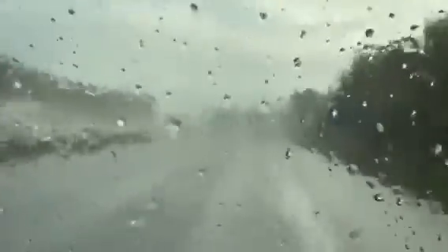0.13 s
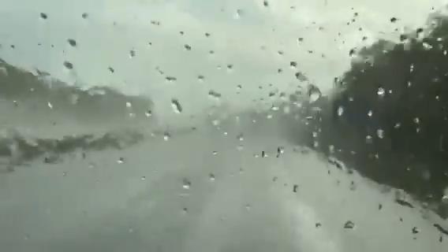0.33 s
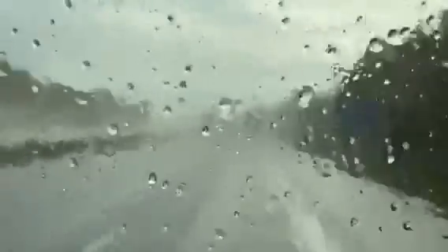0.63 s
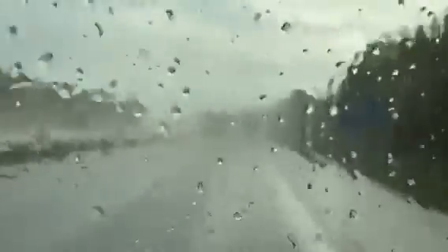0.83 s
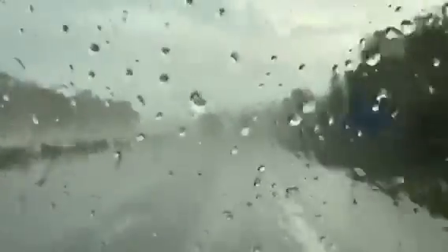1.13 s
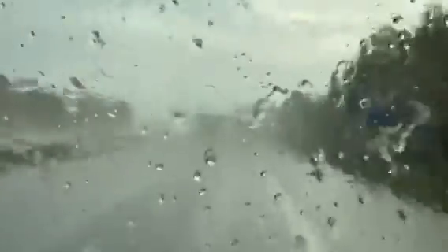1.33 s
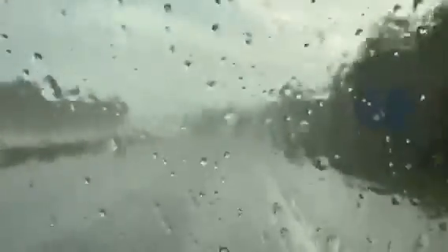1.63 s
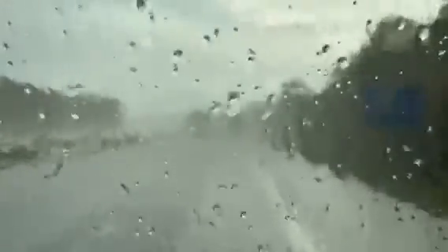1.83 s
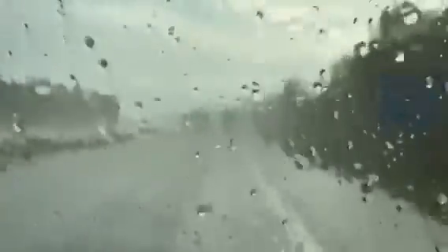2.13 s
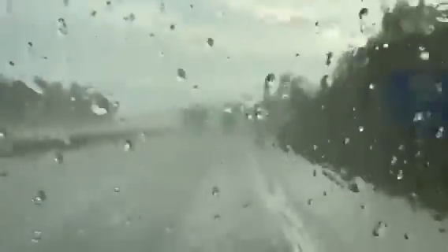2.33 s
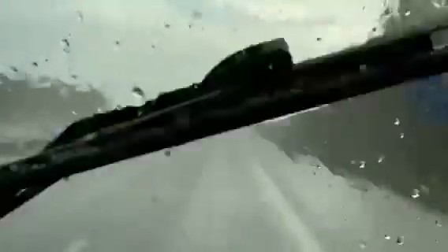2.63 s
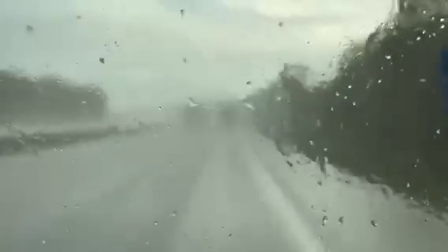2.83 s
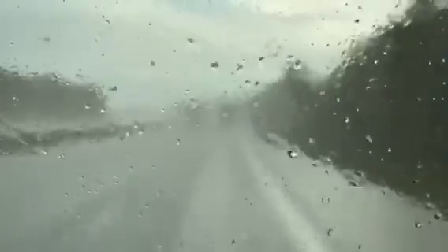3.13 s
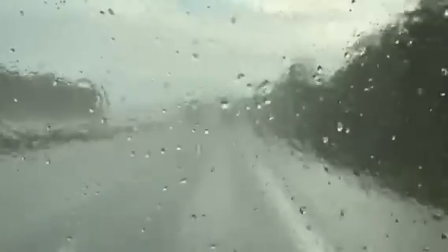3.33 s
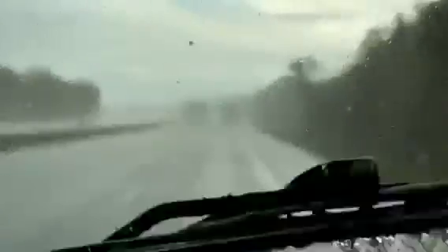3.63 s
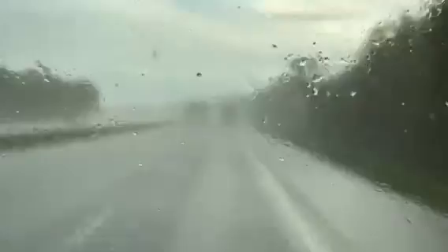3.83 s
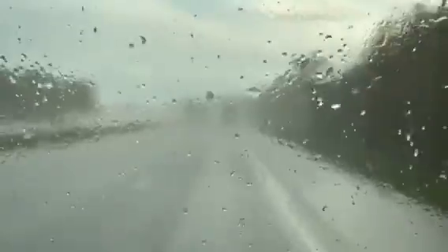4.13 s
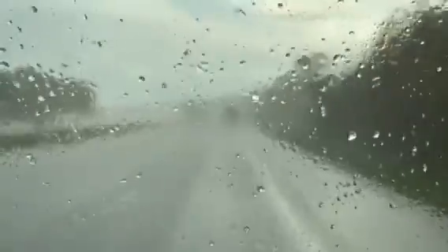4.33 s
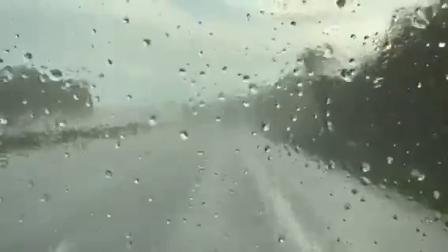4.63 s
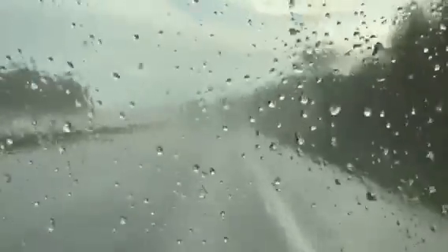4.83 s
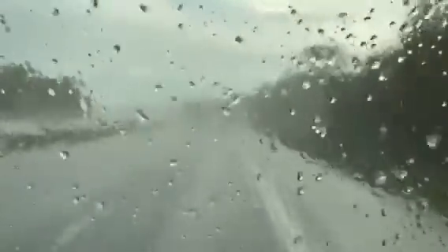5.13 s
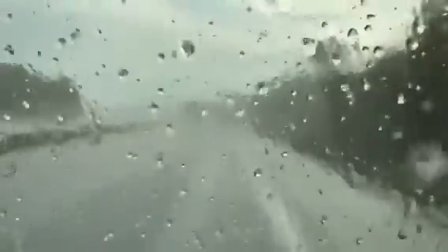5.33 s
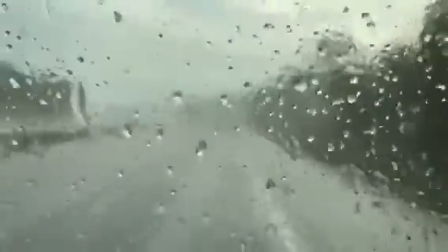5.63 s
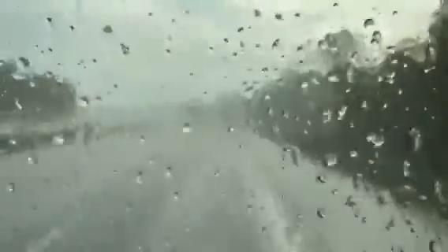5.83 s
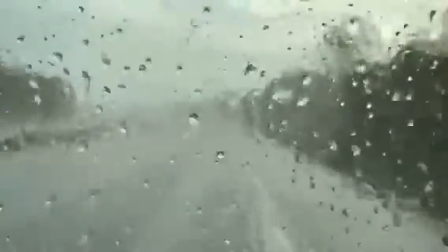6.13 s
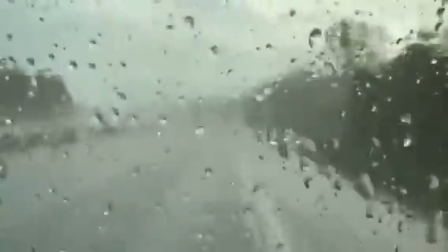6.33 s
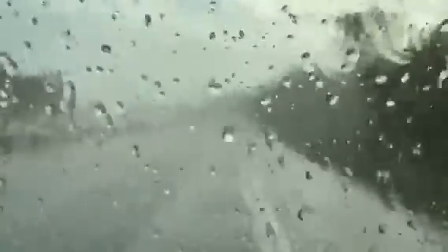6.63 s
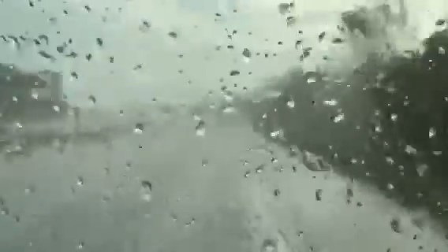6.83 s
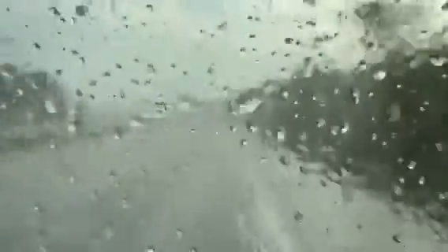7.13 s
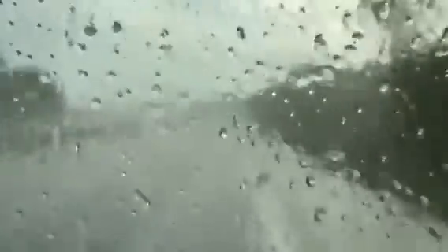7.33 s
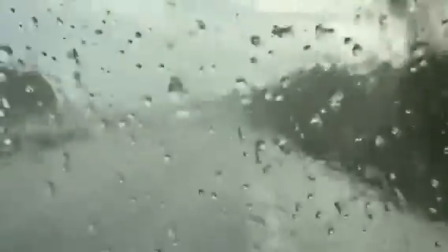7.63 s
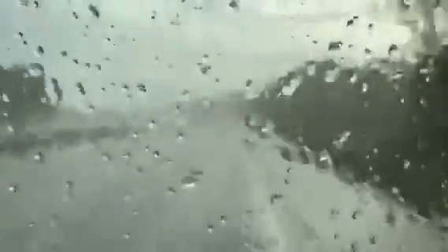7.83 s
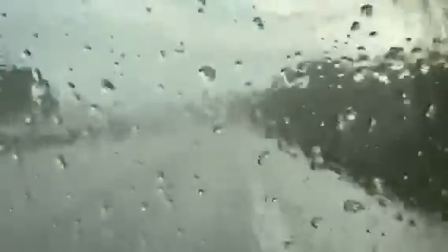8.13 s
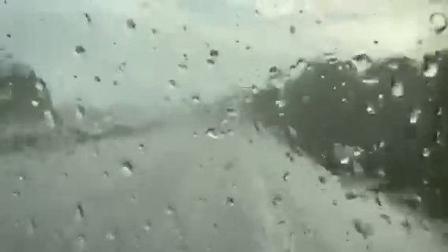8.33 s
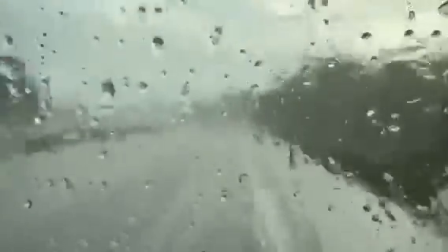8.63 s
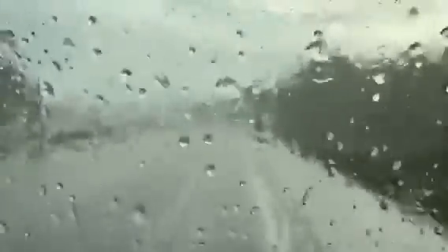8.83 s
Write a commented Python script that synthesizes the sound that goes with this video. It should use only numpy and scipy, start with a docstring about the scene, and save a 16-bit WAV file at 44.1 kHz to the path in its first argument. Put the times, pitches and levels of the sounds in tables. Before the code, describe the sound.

Heard from the front seat of a car on a highway, heavy rain spatters densely on the windscreen. Beneath it run a deep road rumble, a low engine hum and the roar of tyres on water. The rain swells around the middle, with a few fat drops snapping on the glass, then eases toward the end. The engine note rises slightly early on and drops back about two seconds later.

```python
"""Highway downpour, inside a car.

The road rumbles through the floor, the engine hums in the cabin, the tyres roar and sing on the water.
Sheets of rain spatter on the windscreen, swelling and easing; a few fat drops snap out.
The gearbox whines faintly during one spell in a lower gear. Later a body panel drones briefly."""
import sys
import numpy as np
from scipy import signal
from scipy.fft import rfft, irfft
from scipy.io import wavfile

SR = 44100
rng = np.random.default_rng(int(sys.argv[2]) if len(sys.argv) > 2 else 0)


def store_pcm(level_fs):
    """Save levels as 16-bit WAV."""
    pcm = np.round(np.clip(level_fs, -1, 1) * 32767).astype(np.int16)
    wavfile.write(sys.argv[1], SR, np.atleast_2d(pcm).T)


N = 395577
T, HZ = np.arange(N) / SR, np.fft.rfftfreq(N, 1 / SR)

# panel, cabin air and glass resonances, and narrow throbs at wheel-turn orders: f/Hz, width/Hz, lift/dB
BODY_PEAKS = [(39.5, 4.5, 3.5), (46, 4, -6), (52.6, 5, 4), (87.6, 6, 0), (98.4, 6.5, 2), (129, 10, 0.5),
              (182, 11, 0.5), (261, 24, 1.5), (330, 14, 1.5), (394, 8.9, 5), (653, 30, 1), (835, 80, 1),
              (4280, 150, 2.5), (5080, 400, 4), (7000, 200, 1.1)]
# left-right likeness: f/Hz, coherence/0-1
COHERENCE = [(30, .999), (60, .993), (100, .98), (150, .93), (300, .76), (500, .72), (700, .52), (1200, .4),
             (1550, .1), (1900, .7), (2400, .94), (3000, .997), (4000, 1), (8000, 1), (9000, .998)]
# left minus right: f/Hz, level/dB
TILT_DB = [(30, 0), (100, -0.9), (200, 0), (400, 2), (700, 1), (1100, 2), (1550, 6), (2000, 4.5),
           (2500, -0.3), (3000, 0)]
# body shell spectrum: f/Hz, level/dB
RUMBLE_DB = [(10, -32), (28, -13), (40, -3.5), (55, -2.5), (90, -0.9), (125, -6.5), (160, -8), (192, -4.5),
             (222, -16.5), (290, -17.3), (400, -22.5), (1200, -61)]
# asphalt coarseness: t/s, level/dB
ASPHALT_DB = [(0, -23.5), (1.8, -22), (2.2, -24), (5.0, -21.5), (5.8, -24), (7.1, -28), (8.97, -26.5)]
# rough and smooth patches: t/s, length/s, lift/dB
BUMPS_DB = [(1.25, .12, 2), (1.62, 0.23, 1.5), (2.12, 0.09, -0.5), (3.08, .1, 2.5), (3.42, .1, 1),
            (3.81, .1, 2.5), (4.34, 0.11, 1), (4.9, .2, 1), (5.54, .14, 3), (5.72, 0.18, -2.5),
            (6.17, 0.5, 2), (7.5, .15, 5)]
# wet tyre spectrum: f/Hz, level/dB
ROAR_DB = [(100, -26), (228, -3.5), (280, 0.5), (352, -4.5), (440, -0.5), (620, -2), (820, -1.5),
           (1050, -6), (1500, -11.5), (2500, -17), (8000, -32)]
# roar from standing water: t/s, level/dB
WATER_DB = [(0, -29.5), (.4, -26), (.9, -26), (1.2, -29), (1.45, -27.6), (2.15, -29.5), (3.05, -28.5),
            (3.38, -25.7), (3.57, -27.4), (4.45, -25), (4.75, -26.5), (5.7, -25.5), (6.7, -26.5),
            (7.0, -27), (7.34, -29.5), (7.55, -29), (8.07, -31.8), (8.8, -28.5)]
# crank speed in top gear: t/s, f/Hz
CRUISE_HZ = [(0, 28.4), (.4, 28.4), (1.5, 28.28), (3.9, 28.44), (5.5, 28.64), (7.5, 28.68), (7.9, 28.47),
             (8.97, 28.4)]
# engine orders: crank multiple, level/dB
ORDERS_DB = [(3, -7), (4, -1), (5, -4), (6, 0)]
# cabin boom response: f/Hz, level/dB
CABIN_DB = [(85, -4), (113, 1.5), (146, -5.5), (172, 0.5), (186, 0.5), (222, -16.5)]
# hum from engine load: t/s, level/dB
LOAD_DB = [(0, -28), (.7, -26.5), (1.5, -27.5), (2.48, -27), (2.7, -31), (3.15, -27), (3.6, -31.5),
           (4.0, -28), (5.2, -27.5), (5.5, -30), (5.72, -24), (6.0, -29), (6.22, -26), (6.7, -28.5),
           (7.6, -32), (7.95, -34.5), (8.4, -29), (8.7, -44)]
# brief dips and swells of the hum: t/s, length/s, lift/dB
WAVERS_DB = [(.96, .1, -12), (1.25, .08, 1.5), (1.55, .1, -11), (2.3, 0.14, -2), (2.48, 0.083, 5),
             (3.06, .08, -11), (3.15, .09, 6.5), (4.81, 0.094, -17), (6.13, .07, -6), (7.05, 0.077, -7)]
# tread whine: t/s, level/dB
TREAD_DB = [(0, -43), (1.4, -37.5), (1.85, -42), (2.3, -37.5), (2.8, -35), (3.2, -39.5), (5.1, -39),
            (5.8, -45), (6.3, -44.5), (8.97, -47)]
# windscreen spectrum: f/Hz, level/dB
GLASS_DB = [(200, -26), (700, -2.5), (1400, -4), (1800, 0.5), (2400, 2), (3300, -1.5), (4300, -4),
            (5900, -8), (8300, -7.5), (11200, -12.5), (13800, -10), (16000, -9)]
# rain strength: t/s, level/dB
RAIN_DB = [(0, -26.5), (.25, -24.5), (.45, -24), (.6, -25.5), (.75, -24.5), (1.05, -25.5), (1.3, -26.5),
           (2.5, -27), (3.0, -25), (3.3, -23.5), (3.9, -23.5), (4.2, -22.5), (6.1, -22), (6.65, -22.5),
           (7.05, -24.5), (7.35, -27), (7.9, -28.5), (8.3, -28), (8.5, -27), (8.97, -26.5)]
# sheets of water and lulls: t/s, length/s, lift/dB
SHEETS_DB = [(.28, 0.042, 1.3), (.46, 0.057, 1.5), (1.22, .12, -1.8), (1.38, .12, 2), (1.61, 0.061, 2),
             (1.89, .12, -2), (1.98, .064, 3.5), (2.59, .07, -3), (2.91, .075, 1), (3.38, .1, 1),
             (3.47, 0.068, -1.5), (4.0, .08, -1), (4.24, .16, 0.5), (4.37, 0.043, -1.4), (4.88, .07, 0.3),
             (4.99, 0.067, 1), (5.08, .09, -0.5), (5.61, 0.066, 1.1), (6.08, 0.06, 1.5), (6.42, .1, 0),
             (6.59, 0.051, -1), (6.77, 0.057, 0.8), (6.98, 0.072, 1.5), (7.15, 0.083, 1),
             (7.37, 0.11, -0.9), (7.56, 0.26, 1.6), (7.79, 0.069, -0.5), (8.08, .08, -1.5), (8.33, .06, -2),
             (8.42, 0.06, 1.8)]
# treble from fine spray: t/s, lift/dB
SPRAY_DB = [(0, 4), (.3, 3.5), (.9, 2.5), (1.8, 1.5), (2.8, 0.9), (4.5, 1.6), (6.8, 1.1), (8.97, 0.2)]
# fat drops: t/s, level/dB, brightest f/Hz
DROP_HITS = [(1.2976, -11, 8000), (1.7647, -13, 6500), (1.8453, -13, 7000), (1.9805, -14, 4000),
             (2.1187, -15, 8500), (2.427, -19, 8000), (2.4579, -13, 7000), (2.9114, -10, 4000),
             (3.558, -12, 5500), (4.034, -6, 4500), (4.4778, -5, 6980), (4.5068, -5, 6200),
             (4.72, -6, 6450), (5.482, -6, 6000), (5.6, -8, 4200), (5.645, -12, 4500), (6.521, -8, 4720),
             (7.2924, -14, 8000), (7.9878, -15, 8000), (8.142, -14, 4500), (8.254, -12, 6800),
             (8.3641, -11, 6500), (8.92, -11, 3960)]


def amp(db):
    """dB to gain."""
    return 10 ** (np.asarray(db) / 20)


def unit(x):
    """Scale to rms 1."""
    return x / np.sqrt(np.mean(x ** 2) + 1e-20)


def curve(rows):
    """Time table, per sample."""
    return np.interp(T, *np.transpose(rows))


def at_hz(rows, hz):
    """Spectrum table, interpolated over log frequency."""
    f, value = np.transpose(rows)
    return np.interp(np.log(hz + 1), np.log(f), value)


def swells(rows):
    """Sum of Gaussian lifts and dips, in dB."""
    return sum(db * np.exp(-(2 * (T - at_s) / length_s) ** 2) for at_s, length_s, db in rows)


def drift(rate_hz, size=4096):
    """Slow random wander, rms 1, little above rate_hz."""
    hz = HZ[:size // 2 + 1]
    slow = rfft(rng.standard_normal(size)) * (hz > 0) / (1 + (hz / rate_hz) ** 2)
    return np.interp(T, np.linspace(0, T[-1], size), unit(irfft(slow, size)))


def through_body(pair, spectrum):
    """Two unrelated signals, coloured by spectrum, car resonances and wheel throbs, blended to stereo; rms 1."""
    peak_db = sum(db / (1 + (2 * (HZ - hz) / width_hz) ** 2) for hz, width_hz, db in BODY_PEAKS)
    a, b = rfft(pair) * amp(at_hz(spectrum, HZ) + peak_db)
    coherence = np.clip(at_hz(COHERENCE, HZ), 0, 1)
    mid, side = a * np.sqrt(1 + coherence), b * np.sqrt(1 - coherence)
    lean = amp(at_hz(TILT_DB, HZ) / 2)
    return unit(irfft(np.array([(mid + side) * lean, (mid - side) / lean]), N))


def road_rumble(gain_db=0.4, asphalt_ref_db=-24.0, sway_hz=58, sway_share=0.41):
    """Asphalt shakes the body shell; its deepest sway follows the surface less."""
    shell = through_body(rng.standard_normal((2, N)), RUMBLE_DB)
    sway = irfft(rfft(shell) / (1 + (HZ / sway_hz) ** 10), N)
    coarse_db = curve(ASPHALT_DB) + swells(BUMPS_DB) - asphalt_ref_db
    rumble = (shell - sway) * amp(coarse_db) + sway * amp(sway_share * coarse_db)
    return rumble * amp(asphalt_ref_db + gain_db)


def tyre_roar(slosh_db=1.2, bump_share=0.14):
    """Tyres plough through standing water."""
    roar = through_body(rng.standard_normal((2, N)), ROAR_DB)
    return roar * amp(curve(WATER_DB) + bump_share * swells(BUMPS_DB) + slosh_db * drift(25))


def in_low_gear(down_s=1.5, up_s=3.72, shift_s=0.159):
    """0 in top gear, 1 in the lower gear."""
    return np.clip((T - down_s) / shift_s, 0, 1) - np.clip((T - up_s) / shift_s, 0, 1)


def engine_hum(gain_db=0.1, gear_step=1.305, wobble=0.0011, waver_db=0.6, lean_db=1.0,
               lower_boom_db=-5.0, low_gear_db=3, crossover_hz=150, skew_turns=0.034):
    """Crank orders excite two cabin booms; low gear drives the lower boom harder."""
    low_gear = in_low_gear()
    crank_hz = curve(CRUISE_HZ) * gear_step ** low_gear
    turns = np.cumsum(crank_hz * (1 + wobble * drift(3.9))) / SR
    load_db = curve(LOAD_DB) + swells(WAVERS_DB)
    hum = 0
    for order, db in ORDERS_DB:
        hz = order * crank_hz
        upper = 1 - 1 / (1 + (hz / crossover_hz) ** 20)
        boom_db = at_hz(CABIN_DB, hz) + (lower_boom_db + low_gear_db * low_gear) * (1 - upper)
        gain = amp(db + load_db + boom_db + waver_db * drift(4.5))
        skew = np.array([[1], [-1]]) * skew_turns * upper  # upper boom stands across the cabin
        hum = hum + gain * np.cos(2 * np.pi * (order * turns + rng.random() + skew))
    return np.sqrt(2) * hum * amp(gain_db) * amp([[lean_db], [-lean_db]])


def tread_whine(slaps_per_turn=14.39, wobble=0.0052, waver_db=2.0, lean_db=3):
    """Tread blocks slap the road at a rate tied to car speed: a thin, unsteady tone."""
    slap_hz = slaps_per_turn * curve(CRUISE_HZ) * (1 + wobble * drift(16.3))
    tone = np.sqrt(2) * np.cos(2 * np.pi * np.cumsum(slap_hz) / SR)
    return tone * amp(curve(TREAD_DB) + waver_db * drift(22)) * amp([[lean_db], [-lean_db]])


def spatter(per_s=4600, dull_spread_db=4.0, bright_spread_db=4.5, width_oct=0.75, bands=8,
            top_ring_s=0.00045, echo_share=0.6, echo_s=0.0071):
    """Each drop is a tiny noise burst with its own size and colour; the cabin adds a short tail."""
    onsets = np.flatnonzero(rng.random(N) < per_s / SR)
    size, colour = rng.random((len(onsets), 2)).T
    spread_db = dull_spread_db + colour * (bright_spread_db - dull_spread_db)
    power = amp(-spread_db * np.log(size + 0.018)) ** 2  # many small drops, few large
    centres_oct = np.linspace(np.log2(1200), np.log2(15000), bands)
    brightest_oct = centres_oct[0] - .5 + colour * (centres_oct[-1] + 1 - centres_oct[0])
    echo_pole = np.exp(-1 / (echo_s * SR))
    noise, out = rfft(rng.standard_normal((2, N))), 0
    for centre_oct, share in zip(centres_oct, np.eye(bands)):
        hits = np.bincount(onsets, power * np.exp(-((brightest_oct - centre_oct) / width_oct) ** 2), N)
        ring_s = top_ring_s * 2 ** ((centres_oct[-1] - centre_oct) / 2)  # low bands ring longer
        splash = signal.lfilter([1], [1, -np.exp(-1 / (ring_s * SR))], hits + 1e-12)
        echo = signal.lfilter([1 - echo_pole], [1, -echo_pole], splash)
        band = irfft(noise * np.sqrt(np.interp(np.log2(HZ + 1), centres_oct, share)), N)
        out = out + band * unit(np.sqrt(splash + echo_share * echo))
    return out


def pings(per_s=260, spread_db=1.0, cycles=11, low_hz=2500, high_hz=12500):
    """Some drops burst with a pitch: a few cycles of ring."""
    when, pitch, size = rng.random((int(per_s * N / SR), 3)).T[:, :, None]
    hz = low_hz * (high_hz / low_hz) ** pitch
    turns = hz * T[:SR // 80]
    gain = hz * amp(-spread_db * np.log(size + .02))
    rings = gain * np.sin(2 * np.pi * turns) * turns * np.exp(-2 * turns / cycles)
    samples = (when * N).astype(int) + np.arange(turns.shape[1])
    return unit(np.bincount(samples.ravel(), rings.ravel(), N)[:N])


def rain(gain_db=1.0, ping_db=-10, wash_db=-5, gust_db=0.22,
         spray_hz=4200, spray_wash_db=-3, spray_gust_db=0.76):
    """Drops on the windscreen over a wash of distant ones; fine spray is mostly separate drops."""
    drops = spatter()
    drops[0] += amp(ping_db) * pings()  # row 0 becomes the stereo mid
    highpass = 1 - 1 / (1 + (HZ / spray_hz) ** 4)
    wash = irfft(rfft(rng.standard_normal((2, N))) * amp(wash_db + spray_wash_db * highpass), N)
    glass = through_body(drops + wash, GLASS_DB)
    spray = irfft(rfft(glass) * highpass, N)
    spray_db = curve(SPRAY_DB) + spray_gust_db * drift(23)
    downpour_db = curve(RAIN_DB) + swells(SHEETS_DB) + gust_db * drift(36)
    return (glass - spray + spray * amp(spray_db)) * amp(downpour_db + gain_db)


def fat_drops(gain_db=-8, rise_s=0.00047, ring_db=-15, ring_s=0.0093, width_oct=0.46):
    """Large drops burst on the glass in about 2 ms; the cabin rings briefly."""
    out, t = np.zeros((2, N)), T[:SR // 20]
    hz = np.fft.rfftfreq(len(t), 1 / SR)
    envelope = t / rise_s * np.exp(1 - t / rise_s) + amp(ring_db) * np.exp(-t / ring_s)
    for at_s, db, centre_hz in DROP_HITS:
        colour = 1 / np.sqrt(1 + (np.log2((hz + 1) / centre_hz) / width_oct) ** 2)
        noise = unit(irfft(rfft(rng.standard_normal(len(t))) * colour, len(t)))
        snap = amp(db + gain_db) * envelope * noise
        start = int(at_s * SR)
        out[:, start:start + len(t)] += snap[:N - start]
    return out


def gear_whine(level_db=-46, hz=535, wobble=0.0054, waver_db=2.5):
    """The gearbox sings faintly while the lower gear is engaged."""
    turns = np.cumsum(hz * (1 + wobble * drift(12.4))) / SR
    return np.sqrt(2) * np.cos(2 * np.pi * turns) * in_low_gear() * amp(level_db + waver_db * drift(11))


def panel_drone(level_db=-37, hz=260, width_hz=16, peak_s=5.8, length_s=0.71):
    """One body panel, shaken by the road, drones for a moment."""
    resonance = 1 / (1 + (2 * (HZ - hz) / width_hz) ** 2)
    ring = unit(irfft(rfft(rng.standard_normal(N)) * resonance, N))
    return ring * amp(level_db) * np.exp(-(2 * (T - peak_s) / length_s) ** 2)


def scene():
    """Stereo mix at the front seat."""
    driving = road_rumble() + tyre_roar() + engine_hum() + tread_whine()
    return driving + rain() + fat_drops() + panel_drone() + gear_whine()


def record(dry, lag_s=0.000261, lag_above_hz=8300, cutoff_hz=15780):
    """Top treble arrives later on the left; both channels are low-passed."""
    lag = np.exp(-2j * np.pi * HZ * lag_s * (HZ > lag_above_hz))
    heard = np.array([irfft(rfft(dry[0]) * lag, N), dry[1]])
    lowpass = signal.firwin(1023, cutoff_hz, window=("kaiser", 9), fs=SR)
    return signal.oaconvolve(heard, lowpass[None], "same")


dry = scene()
out = record(dry)
store_pcm(out)
```